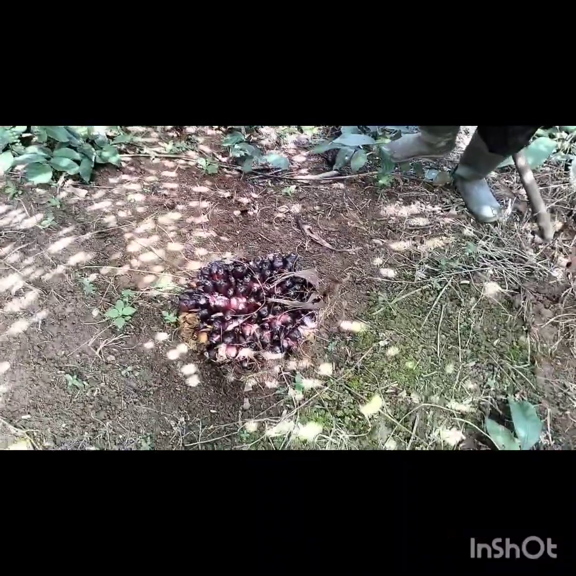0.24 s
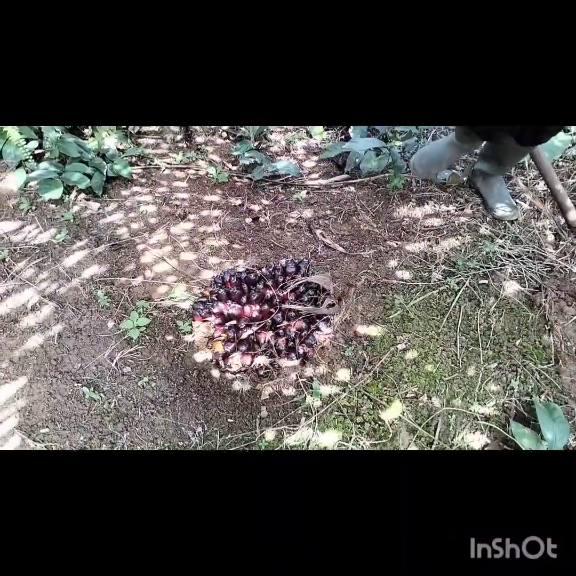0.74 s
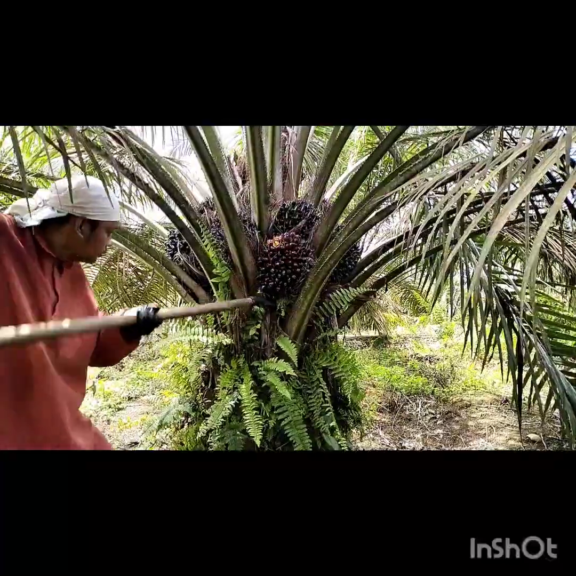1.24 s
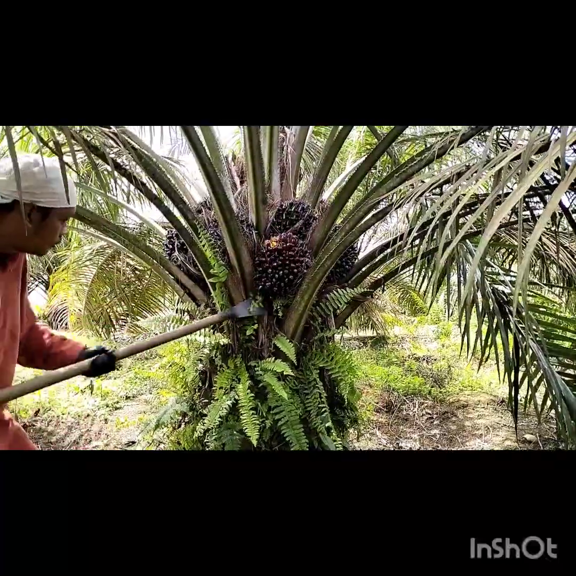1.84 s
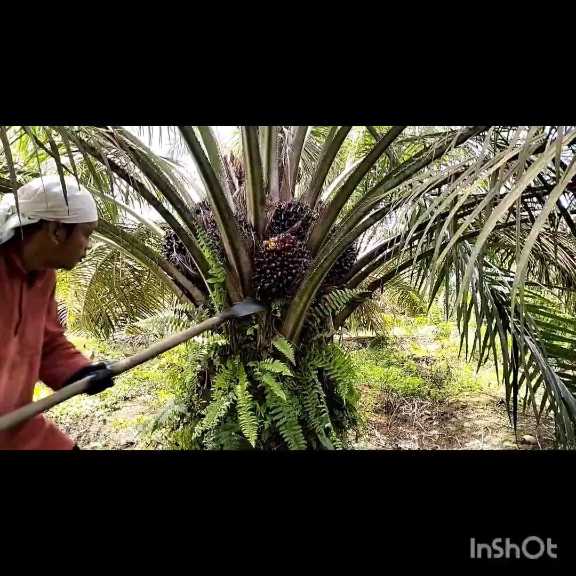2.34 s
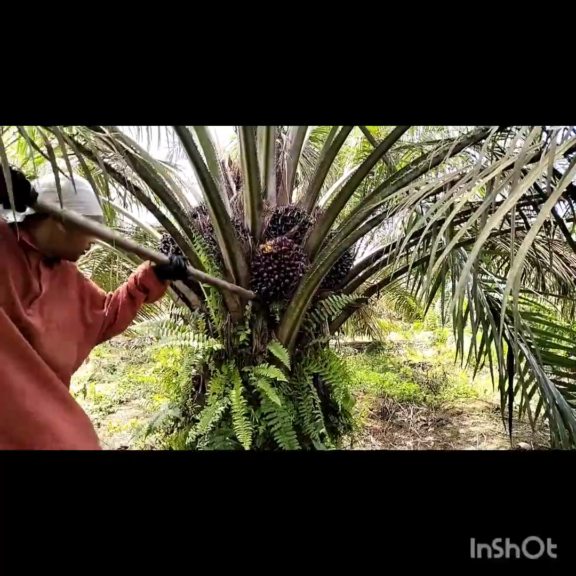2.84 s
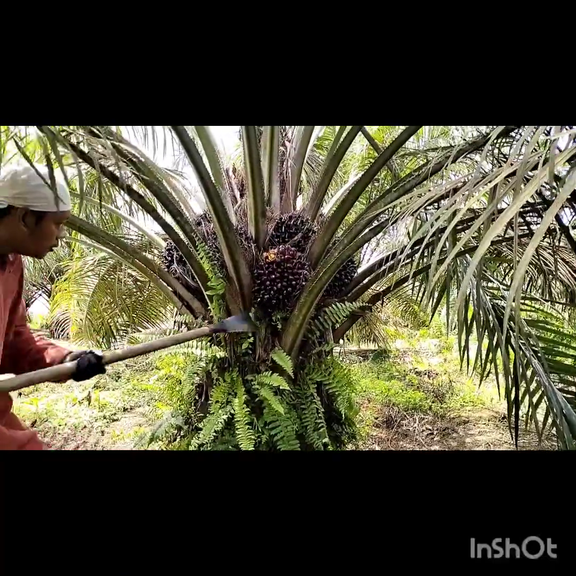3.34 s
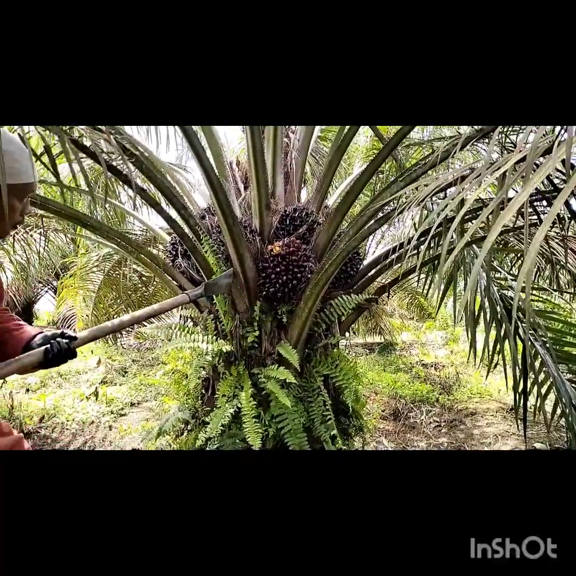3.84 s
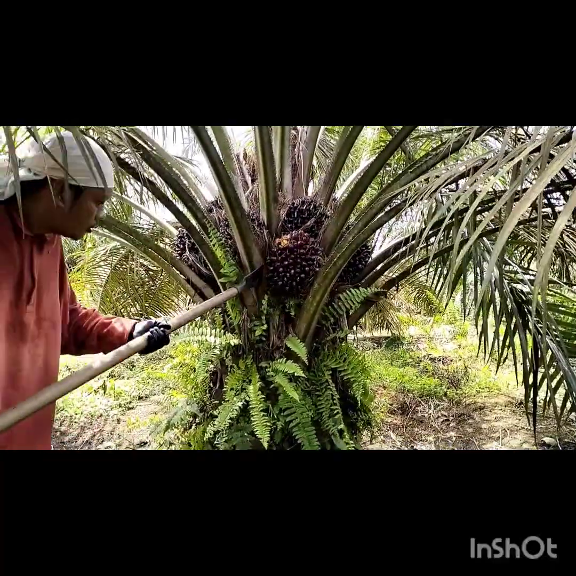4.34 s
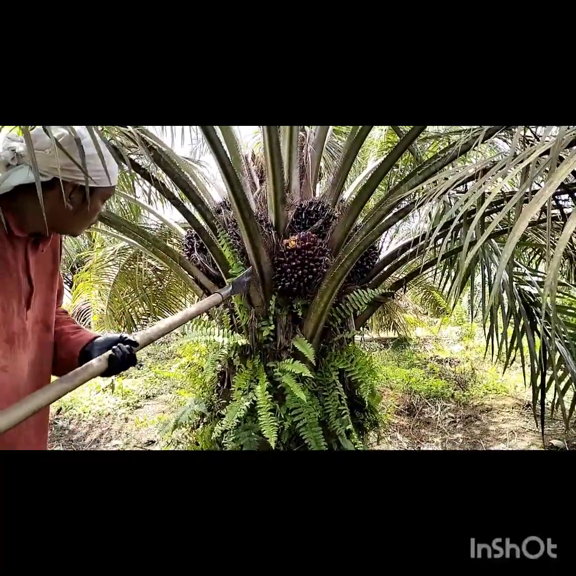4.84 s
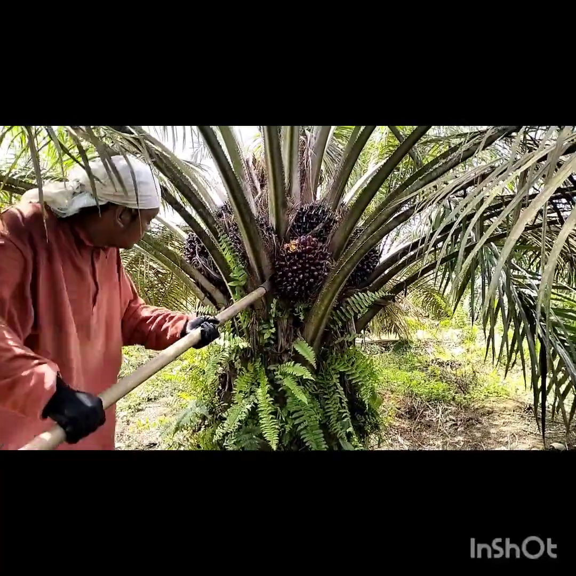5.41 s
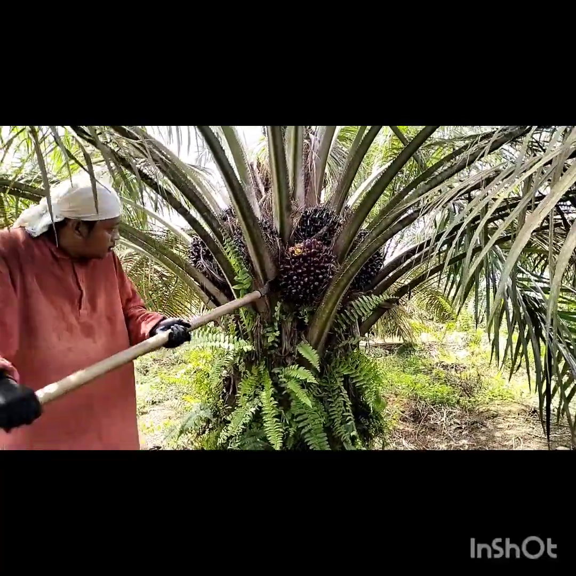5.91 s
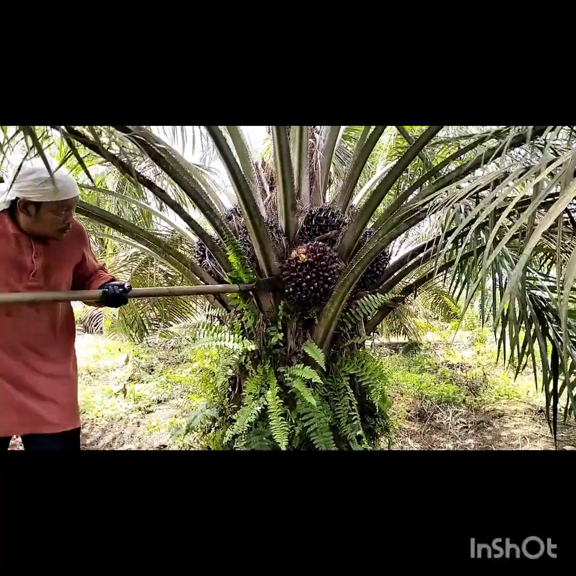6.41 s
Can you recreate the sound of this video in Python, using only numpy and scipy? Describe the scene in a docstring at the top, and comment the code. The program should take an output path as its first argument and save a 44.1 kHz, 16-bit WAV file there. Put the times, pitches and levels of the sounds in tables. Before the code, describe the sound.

Close stereo outdoors, dry with a faint woodland tail. From 0 s, soft frond scraping and a high thin insect hiss; a low short tone near 0.17, a loud hollow wooden pole knock at 0.31 with weak bounces, then small cracks and dull blade rings at 0.6 and 0.75. Total silence from 0.86 to 0.99. At 1.04 a crisp chop into wet fibre, then faint creaks and ticks. At 1.82 a thunk with a short rising squeak near 1.85; a faint rising zip around 2.0. The heaviest chops come at 2.5, 2.62 and 2.82, boomy and crunching, with a rapid creak between and a smaller hit at 2.99. Rustling dwindles; faint insects trill. Single chops at 4.38 and 5.34, a barely audible wavering call around 5. From 6.0 cracks gather, dense between 6.18 and 6.46, with a metallic ring and rushing leaves at 6.42, then settling.

```python
"""A chisel on a long pole is rammed into the frond bases of an oil palm: noise bursts as wet fibre breaks
ring damped modes of shaft, blade and stalk. Stick-slip pulses make the wedged blade creak, a rising noise band
draws it out, and struck modes ring blade and pole, which knocks on the ground before a short silence.
Clumped noise rustles as a frond tears loose and comes down, with sine thuds and short smooth tones. Behind it,
outside the silence, are a noise chorus of insects, trilled cicada tones, a faint wavering call and open-air noise."""
import sys
import numpy as np
from scipy import signal
from scipy.fft import rfft, irfft, next_fast_len
from scipy.io import wavfile

SR = 44100
rng = np.random.default_rng(int(sys.argv[2]) if len(sys.argv) > 2 else 0)


def materialize(psi):
    """Save the field psi as 16-bit PCM at rate SR to the path in sys.argv[1].

    A 1-D psi becomes a single channel; in a 2-D psi each row is a channel.
    """
    bounded = np.clip(np.atleast_2d(psi).T, -1, 1)
    quanta = np.round(bounded * 32767).astype(np.int16)
    wavfile.write(sys.argv[1], SR, quanta)


N = 294147
TIME = np.arange(N) / SR


def amp(db):
    """Logarithmic level: decibels to gain."""
    return 10 ** (np.asarray(db) / 20)


def unit(x):
    """Power normalisation: scales to rms 1."""
    return x / np.sqrt(np.mean(x ** 2) + 1e-20)


def read(points, hz):
    """Logarithmic pitch: reads a spectrum on a log-frequency axis."""
    f, value = np.transpose(points)
    return np.interp(np.log(hz + 1), np.log(f + 1), value)


def follow(rows):
    """Piecewise-linear modulation: gain, silent outside the rows, then the other columns, per sample."""
    s, db, *others = np.transpose(rows)
    inside = (TIME >= s[0]) * (TIME <= s[-1])
    gain = amp(np.interp(TIME, s, db)) * inside
    return [gain] + [np.interp(TIME, s, column) for column in others]


def add(mix, s, sound):
    """Superposition: mixes a sound in at time s."""
    part = mix[max(round(s * SR), 0):][:len(sound)]
    part += sound[:len(part)]


def convolve(x, response):
    """Linear system: convolves every channel with an impulse response."""
    return signal.oaconvolve(np.atleast_2d(x), np.atleast_2d(response), axes=1)[:, :N]


def causal(points, size=2048):
    """Minimum phase: the log-gain fixes the phase, giving a causal impulse response."""
    log_gain = np.log(amp(read(points, abs(np.fft.fftfreq(size, 1 / SR)))))
    return np.fft.ifft(np.exp(np.conj(signal.hilbert(log_gain)))).real[:size // 2]


def colour(x, points):
    """Spectral shaping: gives white noise a spectrum and keeps its power."""
    response = causal(points)
    return convolve(x, response / np.linalg.norm(response))


def drift(hz):
    """Band-limited randomness: a fluctuation of rms 1 with rates below hz."""
    size = next_fast_len(N)
    spectrum = rfft(rng.standard_normal(size))
    return unit(irfft(spectrum * (np.fft.rfftfreq(size, 1 / SR) < hz))[:N])


# left-right correlation of diffuse noise: (frequency [Hz], likeness [-1 to 1])
LIKENESS = [(200, 0.79), (700, 0.79), (1400, 0.32), (2600, 0.23), (3600, 0.038), (6000, -0.72),
            (12000, 0.28)]


def noise_pair():
    """Spatial coherence: white noise at two ports, alike in the bass, less so higher up,
    opposed around 6 kHz, slightly alike at the top."""
    size = 2 * next_fast_len(N // 2 + 1)
    a, b = rfft(rng.standard_normal((2, size)))
    same = np.clip(read(LIKENESS, np.fft.rfftfreq(size, 1 / SR)), -1, 1)
    return irfft([a, same * a + np.sqrt(1 - same ** 2) * b])[:, :N]


def fibres(clump_db, clump_hz):
    """Amplitude modulation: noise in tiny clumps, as fibres let go in bundles."""
    return noise_pair() * unit(amp(clump_db * np.clip(drift(clump_hz), -2, 2)))


def bursts(times, levels_db, fades, rise, holds=0):
    """Exponential relaxation: sudden bursts hold for a moment and die away (all times in s)."""
    out, t = np.zeros(N), TIME[:SR // 4]
    for s, db, fade, hold in np.broadcast(times, levels_db, fades, holds):
        onset = 1 - np.exp(-t / rise)
        add(out, s, amp(db) * onset * np.exp(-np.maximum(t - hold, 0) / fade))
    return out


def swell(s, rise, hold, fade):
    """Exponential growth and decay: grows until time s, holds, and dies away."""
    before, after = np.maximum(s - TIME, 0), np.maximum(TIME - s - hold, 0)
    return np.exp(-np.minimum(before / rise + after / fade, 20))


def resonate(push, modes, lowest_hz):
    """Modal resonance: rings damped modes of a body that radiates little below lowest_hz; keeps the power."""
    t = TIME[:SR // 8]
    response = sum(amp(db) * np.exp(-np.pi * width * t) * np.sin(2 * np.pi * hz * t) for hz, width, db in modes)
    response = signal.sosfilt(signal.butter(3, lowest_hz, "high", fs=SR, output="sos"), response)
    return convolve(push, response / np.linalg.norm(response))


def struck(blows, modes, spread):
    """Free vibration: each blow rings an object's modes, with slightly different phases at each port."""
    out, t = np.zeros((2, N)), TIME[:SR // 2]
    hz, db, t60 = np.transpose(modes)[:, :, None]
    onset = 1 - np.exp(-t / 0.0038)
    shape = amp(db - 60 * t / t60) * onset / np.linalg.norm(amp(db))
    for s, blow_db in blows:
        start, offset = rng.uniform(-np.pi, np.pi, (2, len(modes), 1))
        for channel, side in zip(out, (-1, 1)):
            tones = np.sin(2 * np.pi * hz * t + start + side * spread * offset)
            add(channel, s, amp(blow_db) * (shape * tones).sum(0))
    return out


# blade strokes through fibre: (time [s], level [dB], then relative to it: stalk boom [dB],
# blade bite [dB], treble snap [dB]; travel [s], fade [s])
STROKES = [(1.034, -37, -36, 2.5, 0, .008, 0.0027), (1.044, -17, -12.5, 1.5, -4, 0.0051, 0.0084),
           (1.816, -18, -10.5, -2, -25.5, .022, 0.01), (1.888, -31, -2, -20, -27, 0.015, 0.0091),
           (2.498, -6.5, -20.5, -6, -9.5, 0.0068, 0.0084), (2.508, -8, -9, -7, -13, 0.027, 0.0045),
           (2.624, -16, 0, -12, -21.5, 0.016, 0.0051), (2.813, -4.5, -4, -6, -18, 0.0034, .007),
           (2.831, -8.5, 2, 1, -26, 0.019, 0.0094), (2.991, -21.5, -3, -25, -4, 0.00223, 0.014),
           (4.381, -17.5, -11.5, 0, -4, 0.0039, 0.011), (5.332, -15.5, -13, -1, -5, 0.011, 0.011),
           (5.341, -6, -15.5, 2, -4.5, 0.0082, 0.01)]
# spectra of crunching and of snapping fibre: (frequency [Hz], relative level [dB])
CRUNCH_BAND = [(120, -40.5), (250, -5), (500, -2.5), (900, 0.5), (1400, -7), (2100, 4.5), (2800, -4.5),
               (4000, -24.5), (5500, -21.5), (9000, -53)]
SNAP_BAND = [(1800, -23.5), (3000, 5), (4300, -2.5), (6500, -1), (10000, -7.5), (13500, -4), (16000, -13)]
# resonances of the gripped shaft and of the buried blade: (frequency [Hz], width [Hz], relative level [dB])
SHAFT_MODES = [(653, 28, -8), (830, 80, -2.5), (1086, 60, -13.5), (1219, 100, 5.5), (1342, 38, -8.5),
               (1467, 150, 6.5), (1663, 46, -5.5), (1890, 98, -6), (2049, 51, -5), (2207, 70, 5.5)]
BITE_MODES = [(2440, 32, -3.5), (2620, 150, 8.5), (2680, 60, -9), (3000, 48, -8), (3340, 57, -9.5),
              (3420, 48, -13)]


def chops(stop_db=-7, crunch_db=-10, shaft_db=-8, bite_db=-7, boom_db=-10, snap_db=-6, kick_db=-5):
    """Forced vibration: fibre breaks while the blade travels, driving shaft, blade and stalk."""
    s, db, boom, bite, snap, travel, fade = np.transpose(STROKES)
    breaking = fibres(4, 800) * bursts(s, db, fade, rise=0.0021, holds=travel)
    crunch = colour(breaking * amp(crunch_db), CRUNCH_BAND)

    shaft_push = noise_pair() * bursts(s, db + shaft_db, fade, rise=0.00019, holds=travel)
    shaft = resonate(shaft_push, SHAFT_MODES, lowest_hz=400.6)
    blade_push = noise_pair() * bursts(s, db + bite + bite_db, fade, rise=0.0008, holds=travel)
    blade = resonate(blade_push, BITE_MODES, lowest_hz=1900)

    snapping = fibres(3.7, 1400) * bursts(s, db + snap + snap_db, fade, rise=0.0021, holds=travel)
    treble = colour(snapping, SNAP_BAND)

    push = noise_pair() * bursts(s, db + boom + boom_db, fade, rise=0.00038, holds=travel)
    # the blade kicks the stalk as it lands, and again as it is stopped, the harder the further it went
    landing, stopping = np.round(s * SR).astype(int), np.round((s + travel) * SR).astype(int)
    push[:, landing] += amp(db + boom + kick_db) * np.sqrt(fade * SR / 2)
    push[:, stopping] += amp(db + boom + stop_db) * np.sqrt(travel * SR / 2)
    return crunch + shaft + blade + treble + stalk(push)


# resonances of the stalk with the pole pressed into it: (frequency [Hz], width [Hz], relative level [dB])
STALK_MODES = [(292, 42, 0), (340, 46, 1), (390, 60, -8), (625, 60, -16), (800, 55, -14), (1185, 55, -9),
               (1855, 50, -14), (2240, 90, -16)]


def stalk(push):
    """Modal resonance: the boom of the frond base."""
    return resonate(push, STALK_MODES, lowest_hz=250)


# larger dry fibres snapping: (time [s], level [dB], treble relative to it [dB], fade [s])
DRY_CRACKS = [(0.174, -31, -8, 0.0042), (0.211, -47, 12.5, .003), (0.595, -28, -4, 0.0064),
              (0.753, -23.5, -20, 0.0072), (1.339, -41.5, 11, 0.0034), (1.44, -28.5, -20, 0.0044),
              (1.525, -30.5, -14, 0.0087), (1.658, -44, -2, 0.017), (1.694, -39.5, -7.5, 0.011),
              (1.737, -29, -10, 0.0045), (1.763, -34, -1, 0.0051), (2.219, -41.5, -12, 0.012),
              (3.217, -30, -11.5, 0.0091), (3.327, -29.5, -27, 0.018), (4.109, -36, 6, 0.0022),
              (4.139, -30, 4, 0.0012), (5.863, -30, -26.5, 0.009), (5.994, -24.5, -15, 0.012),
              (6.056, -28.5, -9, 0.014), (6.114, -26, 4, 0.012), (6.18, -13, -2.5, 0.0074),
              (6.204, -11, -3.5, 0.011), (6.235, -13, -8, 0.0099), (6.269, -19, 3, 0.0051),
              (6.295, -12.5, 2, 0.0052), (6.347, -19, -4, 0.012), (6.398, -25, 3, 0.016),
              (6.415, -13, -1, 0.011), (6.458, -23, 1.5, 0.023), (6.568, -19.5, -13, 0.0025)]
# spectrum of a crack's body: (frequency [Hz], relative level [dB])
CRACK_BODY_BAND = [(60, -36), (250, -1), (700, 1.5), (1300, -2), (1900, 3), (2600, 5.5), (3600, -8),
                   (6000, -21.5), (12000, -25)]


def cracks(body_db=-5, snap_db=-4):
    """Sudden stress release: single dry fibres part with a short bright crack."""
    s, db, snap, fade = np.transpose(DRY_CRACKS)
    body = fibres(4.1, 1000) * bursts(s, db + body_db, fade, rise=0.0001)
    treble = fibres(5.1, 1400) * bursts(s, db + snap + snap_db, fade, rise=0.00027)
    return colour(body, CRACK_BODY_BAND) + colour(treble, SNAP_BAND)


# the blade sticking and slipping, one table a creak:
# (time [s], level [dB], mean slip rate [1/s], stalk boom relative to the level [dB])
STICK_SLIPS = [
    [(1.183, -49.5, 74, -20), (1.20, -47, 58, -15.5), (1.26, -49.5, 76, -27.5), (1.33, -55.5, 75, -52)],
    [(1.40, -51.5, 89, -20), (1.44, -49.5, 70, -18.5), (1.50, -55.5, 60, -21.5)],
    [(2.68, -36.5, 170, 10), (2.725, -26.5, 174, 6), (2.745, -32.5, 146, 11), (2.78, -28.5, 125, 2.5),
     (2.812, -33, 125, 9.5)],
]
# spectrum of rasping: (frequency [Hz], relative level [dB])
RASP_BAND = [(200, -19.5), (500, -16.5), (800, 0.5), (1200, 1.5), (1500, -0.5), (2000, 0), (2700, -5),
             (4200, -18.5), (6500, -18), (12000, -35)]


def creaks(bass_cut_hz=235, rasp_db=-4, shaft_db=-8, knock_db=-7, rub=0.58):
    """Stick-slip friction: each slip of the wedged blade rasps fibres, rings the shaft and kicks the stalk."""
    wander, uneven = 0.05 * drift(70), amp(1.8 * drift(120))
    slip = np.exp(-TIME[:SR // 50] / 0.0014)
    rasp, knocks, kicks = np.zeros((3, N))
    for rows in STICK_SLIPS:
        gain, rate, boom_db = follow(rows)
        turns = np.cumsum(rate * (1 + wander) * (gain > 0)) / SR
        # one pulse at each whole turn, scaled to keep the power at any rate
        pulses = np.diff(np.ceil(turns), prepend=0)
        slips = pulses * np.sqrt(SR / rate) * gain * uneven
        rasp += convolve(slips, slip / np.linalg.norm(slip))[0] + rub * gain
        knocks += slips
        kicks += slips * amp(boom_db)
    rasping = noise_pair() * rasp
    shaft = resonate(amp(shaft_db) * rasping + amp(knock_db) * knocks, SHAFT_MODES, lowest_hz=405)
    # quick slips cannot move the heavy stalk far: little bass
    kicks = signal.sosfilt(signal.butter(4, bass_cut_hz, "high", fs=SR, output="sos"), kicks)
    return amp(rasp_db) * colour(rasping, RASP_BAND) + shaft + stalk(kicks)


# the blade sliding out of the cut: (time [s], level [dB], band centre [Hz])
SLIDE_OUT = [(1.95, -53.5, 997), (1.975, -48.5, 1393), (2.0, -42, 2254), (2.02, -53, 2620),
             (2.055, -57, 3000)]


def withdrawal(width_hz=850, catch_db=2):
    """Gliding band noise: the blade slides out with an unsteady rising zip."""
    gain, hz = follow(SLIDE_OUT)
    catching = unit(amp(catch_db * drift(120)))
    band = unit(drift(width_hz / 2) + drift(width_hz) + 0.5 * drift(2 * width_hz))
    carrier = np.sqrt(2) * np.sin(2 * np.pi * np.cumsum(hz) / SR)
    return gain * catching * band * carrier


# the steel blade ringing, when struck or jarred: (time [s], level [dB])
BLADE_BLOWS = [(0.49, -39.5), (0.597, -34), (0.64, -34.5), (0.755, -33), (1.903, -31), (3.33, -39),
               (4.386, -28), (6.415, -17.5)]
# modes of the blade: (frequency [Hz], relative level [dB], 60 dB decay time [s])
BLADE_MODES = [(2500, 0, .16), (2560, -4, .12), (2435, -2, .11), (2680, -9, .07), (1260, -13, .15)]


def blade_rings():
    """Free vibration: the steel blade rings in its own modes when struck or jarred."""
    return struck(BLADE_BLOWS, BLADE_MODES, spread=0.25)


# the pole knocking and bouncing on the ground: (time [s], level [dB])
POLE_KNOCKS = [(0.312, -9), (0.318, -25), (0.351, -24), (0.367, -50), (0.431, -30.5), (0.490, -38),
               (0.570, -35)]
# modes of the pole: (frequency [Hz], relative level [dB], 60 dB decay time [s])
POLE_MODES = [(368, -24.5, 0.69), (516, -22.5, 0.49), (610, -8.5, 0.062), (667, -10, 0.32),
              (760, -25, 0.05), (850.5, -14, 0.33), (865, -13.5, 0.34), (1024, -11.5, 0.23),
              (1134, -6.5, 0.072), (1250, 1, 0.096), (1434, -8, 0.057), (1510, 0, 0.1), (1782, 0.5, 0.15),
              (1948, -32, 0.056), (2100, -2.5, 0.088), (2270, -12, 0.095), (2490, -4, 0.086)]


def pole(tick_db=-12, tick_s=0.0046, clatter_db=-11, clatter_s=0.017):
    """Impact excitation: the pole rings unsteadily in the hand, scuffs the soil and clatters at every bounce."""
    s, db = np.transpose(POLE_KNOCKS)
    scuff = colour(noise_pair() * bursts(s, db + tick_db, tick_s, rise=0.00062), RASP_BAND)
    chatter = noise_pair() * bursts(s, db + clatter_db, clatter_s, rise=0.0017)
    # the chattering modes are broad: width 7 / t60
    clatter = resonate(chatter, [(hz, 7 / t60, level) for hz, level, t60 in POLE_MODES], lowest_hz=300)
    grip = 1 + 0.3 * drift(77)
    return struck(POLE_KNOCKS, POLE_MODES, spread=0.18) * grip + scuff + clatter


# spectra of scraping ribs and of hissing leaflets: (frequency [Hz], relative level [dB])
SCRAPE_BAND = [(50, -36), (170, -12), (300, -6.5), (900, -4), (1500, -3.5), (2500, 1.5), (4000, -6),
               (7000, -14.5), (12000, -34.5)]
HISS_BAND = [(1500, -23.5), (3500, -2.5), (6000, -6.5), (9500, 2.5), (13000, -3.5), (15500, -12)]


def fronds(scrape_db=-4.0, hiss_db=1, twig_db=4, twig_snap_db=7, twig_fade_s=0.0015, twigs_per_s=22,
           twig_spread_db=5):
    """Friction noise: ribs scrape and leaflets brush in clumps of ticks; now and then a small fibre snaps."""
    scrape, hiss = crown_motion()
    gusts = unit(amp(1.8 * drift(55)))
    ribs = colour(fibres(3.2, 300) * gusts * scrape * amp(scrape_db), SCRAPE_BAND)
    leaflets = colour(fibres(3, 800) * gusts * hiss * amp(hiss_db), HISS_BAND)

    chance = rng.random(N) < twigs_per_s / SR
    snaps = chance * amp(twig_spread_db * (2 * rng.random(N) - 2.5))
    twigs = noise_pair() * convolve(snaps, np.exp(-TIME[:SR // 20] / twig_fade_s))
    twig_body = colour(twigs * scrape * amp(twig_db), CRACK_BODY_BAND)
    twig_treble = colour(twigs * hiss * amp(twig_snap_db), SNAP_BAND)
    return ribs + leaflets + twig_body + twig_treble


# a frond is pushed, slides along its neighbours and settles:
# (time at full speed [s], rib scrape [dB], leaflet hiss [dB], rise [s], slide [s], fade [s])
FROND_SLIDES = [(0.16, -43.5, -58, .25, 0.049, 0.024), (0.40, -44.5, -51.5, 0.15, 0.13, 0.039),
                (0.598, -40.5, -43, 0.005, 0.02, 0.082), (0.756, -33.5, -40, 0.02, .006, 0.028),
                (1.338, -50, -50, .004, 0.065, 0.15), (1.43, -43, -55, 0.15, 0.026, 0.15),
                (1.696, -40.5, -45, .005, 0.057, 0.028), (1.902, -47.5, -57.5, 0.0098, .02, 0.066),
                (2.86, -34, -42.5, 0.12, 0.15, 0.098), (3.22, -37, -52.5, 0.17, 0.072, .16),
                (3.52, -47, -59, 0.04, 0.017, 0.2), (3.72, -53, -67, 0.069, 0.22, 0.044),
                (4.055, -43, -59, 0.031, 0.024, 0.077), (4.496, -46, -47.5, 0.039, 0.039, 0.02),
                (5.16, -53, -65, 0.04, .015, 0.031), (6.18, -28.5, -41, 0.1, 0.038, 0.18),
                (6.385, -27, -48, 0.013, 0.0081, 0.018), (6.42, -23, -34.5, 0.0055, 0.018, 0.073),
                (6.6, -38.5, -53, 0.03, 0.08, .1)]


def crown_motion(shake_db=-36, growth=1.2, shake_hiss_db=-11, shake_rise_s=0.021, shake_fade_s=0.29,
                 still_scrape_db=-66, still_hiss_db=-74.5):
    """Incoherent addition: powers of sliding fronds and of shaking after each stroke sum to scrape and hiss."""
    shakes = []
    for s, db, _, _, _, travel, _ in STROKES:
        # hard strokes shake the crown far more: growth is in dB per dB
        level = shake_db + growth * db
        shakes.append((s, level, level + shake_hiss_db, shake_rise_s, travel, shake_fade_s))
    # the crown never quite rests
    power = amp([[still_scrape_db], [still_hiss_db]]) ** 2
    for s, scrape_db, hiss_db, rise, slide, fade in list(FROND_SLIDES) + shakes:
        power = power + (amp([[scrape_db], [hiss_db]]) * swell(s, rise, slide, fade)) ** 2
    return np.sqrt(power)


# dull shoves of the crown: (time [s], peak envelope level [dB], frequency [Hz], fade [s])
CROWN_SHOVES = [(0.756, -42.5, 199, 0.012), (2.542, -23, 82.5, 0.019), (2.547, -20.5, 306, 0.0096),
                (2.837, -37, 82.5, 0.031), (2.994, -39, 229, 0.013), (3.22, -41.5, 296.6, 0.019),
                (4.393, -38, 217, 0.011), (5.344, -32.5, 175, 0.016), (5.352, -32.5, 75.4, 0.023)]


def thuds():
    """Heavily damped oscillation: the heavy crown gives way for a few cycles."""
    out, t = np.zeros(N), TIME[:SR // 4]
    for s, db, hz, fade in CROWN_SHOVES:
        # the envelope peaks at half the fade
        envelope = 2 * (t / fade) * np.exp(1 - 2 * t / fade)
        add(out, s, amp(db) * np.sin(2 * np.pi * hz * t) * envelope)
    return out


# short smooth tones, squeaks and a faint ring of the blade, one table each:
# (time [s], level [dB], pitch [Hz])
SMOOTH_TONES = [
    [(0.125, -43.5, 193.5), (0.145, -39.5, 181), (0.177, -35.5, 152), (0.20, -60, 137)],
    [(1.838, -40, 599), (1.845, -18, 608), (1.851, -21.5, 660), (1.864, -41, 710)],
    [(2.36, -71, 1170), (2.415, -53.5, 1215), (2.44, -78, 1235)],
]


def smooth_tones(overtone_db=-14):
    """Harmonic series: squeaks, and a faint ring of the blade, as short gliding tones with two overtones."""
    out = np.zeros(N)
    for rows in SMOOTH_TONES:
        gain, hz = follow(rows)
        phase = 2 * np.pi * np.cumsum(hz) / SR
        overtones = np.sin(2 * phase) + 0.5 * np.sin(3 * phase)
        out += np.sqrt(2) * gain * (np.sin(phase) + amp(overtone_db) * overtones)
    return out


# far insect chorus: (time [s], level [dB])
CHORUS_LEVEL = [(0, -54), (.86, -55.5), (1.03, -65.5), (2.5, -63.5), (4, -63), (5.3, -64), (6.67, -60.5)]
# its spectrum: (frequency [Hz], relative level [dB])
CHORUS_SPECTRUM = [(5500, -53), (6500, -18.5), (7000, -6.5), (7300, -3), (7700, -8.5), (8300, -16),
                   (10000, -49.5)]
# two nearer cicadas, one table each: (time [s], level [dB], centre pitch [Hz])
CICADA_NOTES = [
    [(3.1, -73, 6660), (3.6, -68, 6570), (3.8, -67, 6700), (4.5, -67.5, 6640), (4.83, -69, 6650),
     (4.9, -68.5, 6800)],
    [(4.5, -74, 6290), (4.75, -71, 6270), (4.9, -70.5, 6330), (5.3, -69.5, 6400), (5.9, -70.5, 6250),
     (5.97, -77, 6200)],
]


def insects(trills_per_s=30, sweep_hz=35, blur_hz=28, throb=0.69):
    """Amplitude and frequency modulation: two cicadas trill on wavering notes over a far chorus of narrow hiss."""
    out = colour(noise_pair(), CHORUS_SPECTRUM) * follow(CHORUS_LEVEL)[0]
    for rows in CICADA_NOTES:
        gain, hz = follow(rows)
        trill = 2 * np.pi * np.cumsum(trills_per_s * (1 + 0.05 * drift(8))) / SR
        pitch = hz + sweep_hz * np.cos(trill) + blur_hz * drift(71.3)
        note = np.sin(2 * np.pi * np.cumsum(pitch) / SR)
        out += np.sqrt(2) * gain * (1 + throb * np.sin(trill)) * note
    return out


# a faint far animal call: (time [s], level [dB], centre pitch [Hz])
CALL_NOTES = [(4.72, -78, 742), (4.8, -81, 745), (4.91, -70, 781), (5.0, -74, 753), (5.12, -71.5, 714),
              (5.28, -80, 722)]


def far_call(octave_db=0, waver_hz=8):
    """Harmonic tone: a thin wavering note and its octave from deep in the plantation."""
    gain, hz = follow(CALL_NOTES)
    phase = 2 * np.pi * np.cumsum(hz + waver_hz * drift(28.2)) / SR
    note = np.sin(phase) + amp(octave_db) * np.sin(2 * phase)
    return gain * note * (1 + 0.39 * drift(31))


# spectrum of the open air: (frequency [Hz], relative level [dB])
AIR_BAND = [(25, -4), (70, 9), (130, 3.5), (400, -3.5), (1200, -7), (2500, -8.5), (5000, -15.5),
            (9000, -16), (15000, -20)]


def open_air(level_db=-65):
    """Stationary broadband noise: the steady sound of the open air."""
    return amp(level_db) * colour(noise_pair(), AIR_BAND)


# reverberation among the trunks: (frequency [Hz], 60 dB decay time [s])
GROVE_DECAY = [(100, 2.1), (400, 3.1), (2500, 1.1), (6000, 1.1), (15000, .55)]


def grove(x, wet_db=-33, near_db=-15, near_s=0.027):
    """Multiple scattering: near fronds answer after 4 ms; far trunks return a faint long tail."""
    t = TIME[:SR * 3 // 2]
    hz, at, z = signal.stft(noise_pair()[:, :len(t)], SR, nperseg=256)
    decay = amp(-60 * at / read(GROVE_DECAY, hz)[:, None])
    tail = signal.istft(z * decay, SR, nperseg=256)[1][:, :len(t)]
    near = noise_pair()[:, :len(t)] * np.exp(-t / near_s) * (t > 0.004)
    far_part = amp(wet_db) * tail / np.linalg.norm(tail[0])
    near_part = amp(near_db) * near / np.linalg.norm(near[0])
    return convolve(x, far_part + near_part)


def scene():
    """Superposition: the work at the palm, its echo, the animals and the open air."""
    work = chops() + cracks() + creaks() + withdrawal() + blade_rings() + pole()
    around = insects() + far_call() + open_air()
    return work + grove(work) + fronds() + thuds() + smooth_tones() + around


# each microphone port has its own peaks and notches, one table each: (frequency [Hz], gain [dB])
PORT_RESPONSES = [
    [(1800, 0.5), (2750, 0), (4000, 3.5), (5200, -4), (6300, -3), (7050, -20.5), (7900, -2), (8900, 7.5),
     (12000, 4), (15000, 8.5)],
    [(1800, 0.5), (2400, -3), (3700, -1), (5000, 6.5), (6900, 10), (7600, 4.5), (8300, -13), (8900, -22),
     (10000, -7.5), (12000, 0), (15000, 7)],
]


def record(dry, ceiling=0.76, edge_hz=15600):
    """Transfer chain: port colour, soft overload, a bass cut, a short silence and the band limit."""
    heard = convolve(dry, np.array([causal(port) for port in PORT_RESPONSES]))
    heard = ceiling * np.tanh(heard / ceiling)
    heard = signal.sosfilt(signal.butter(2, 42, "high", fs=SR, output="sos"), heard)
    # everything is silent from 0.862 to 0.99 s
    heard = heard * np.interp(TIME, [0.845, 0.862, 0.99, 1.025, 1.032], [1, 0, 0, 0.05, 1])
    band_limit = signal.firwin(255, edge_hz, window=("kaiser", 8), fs=SR)
    return signal.oaconvolve(heard, band_limit[None], "same", axes=1)


dry = scene()
out = record(dry)
materialize(out)
```